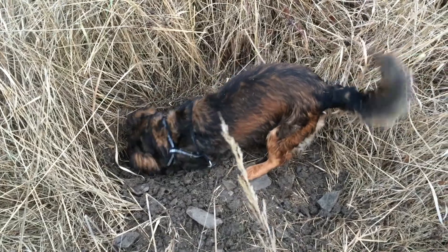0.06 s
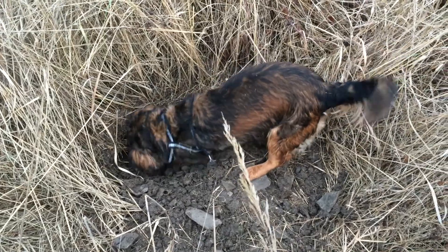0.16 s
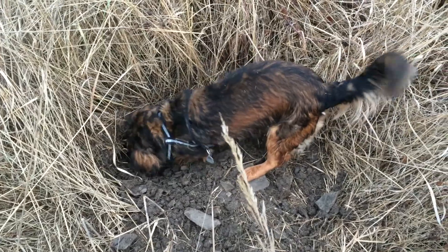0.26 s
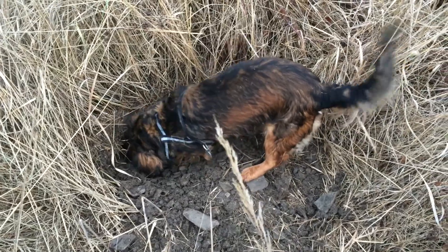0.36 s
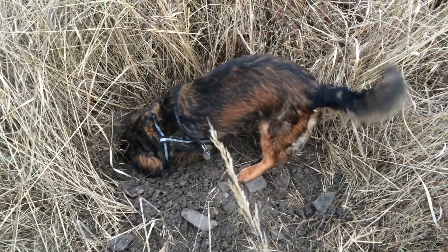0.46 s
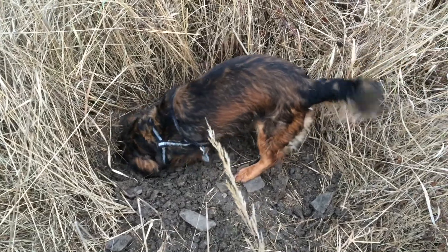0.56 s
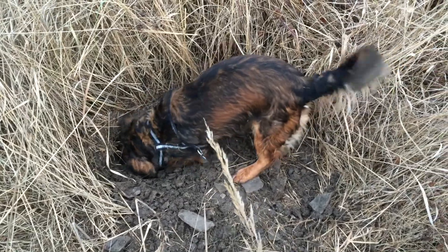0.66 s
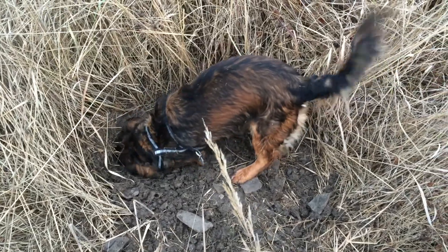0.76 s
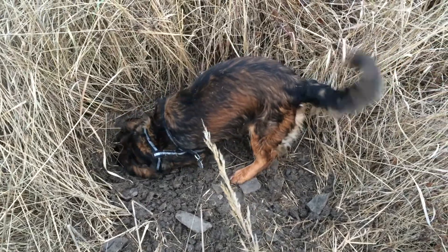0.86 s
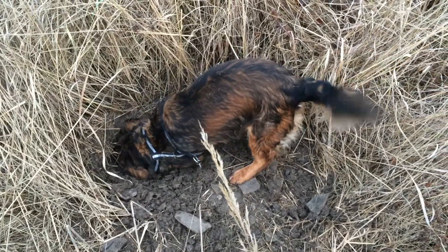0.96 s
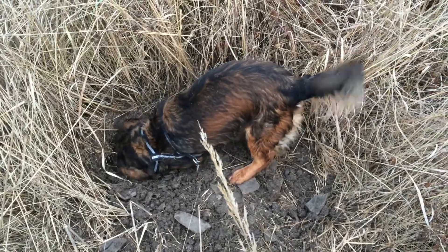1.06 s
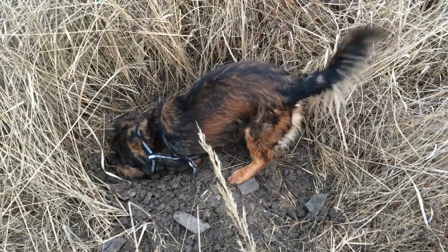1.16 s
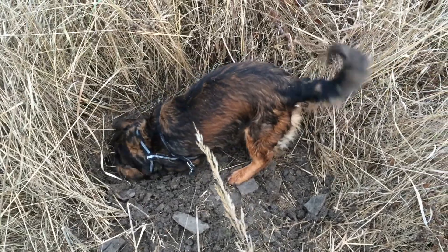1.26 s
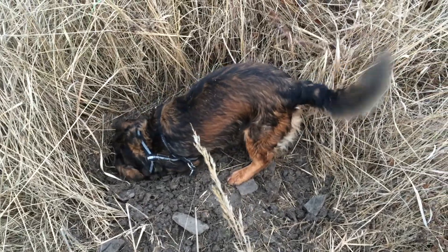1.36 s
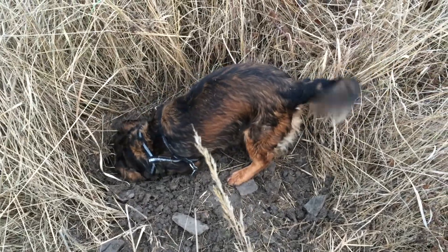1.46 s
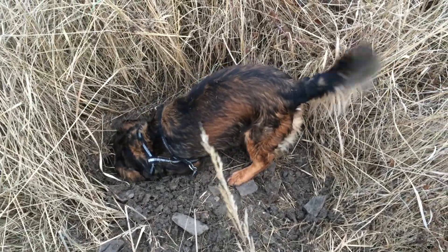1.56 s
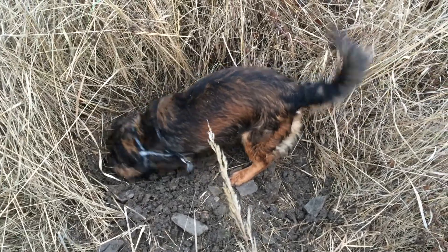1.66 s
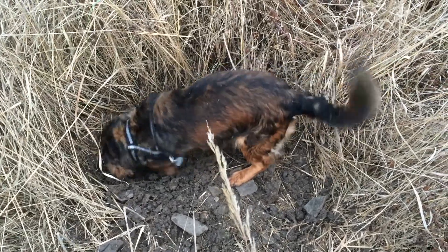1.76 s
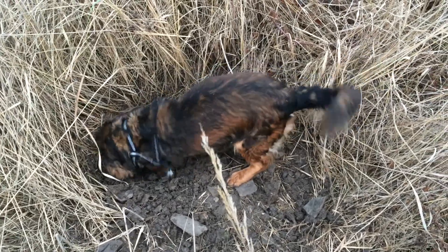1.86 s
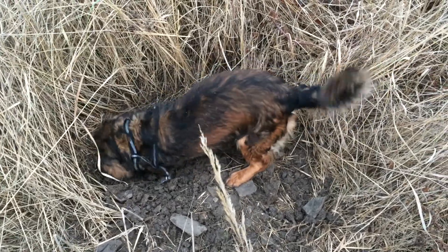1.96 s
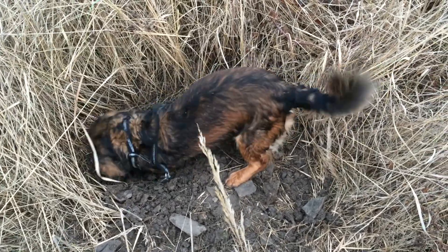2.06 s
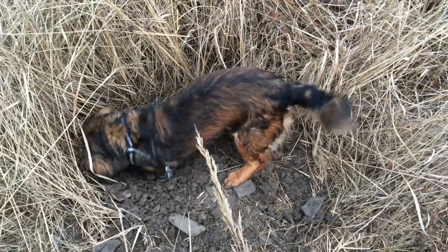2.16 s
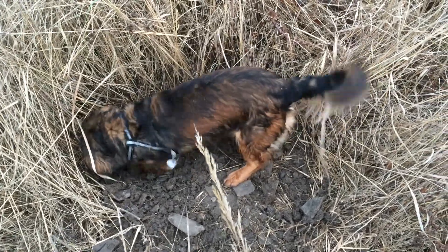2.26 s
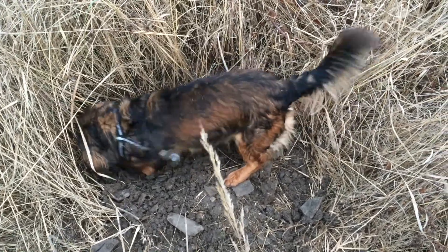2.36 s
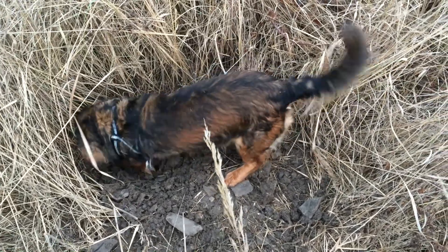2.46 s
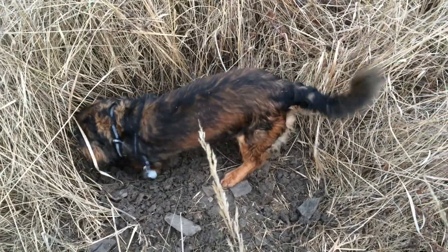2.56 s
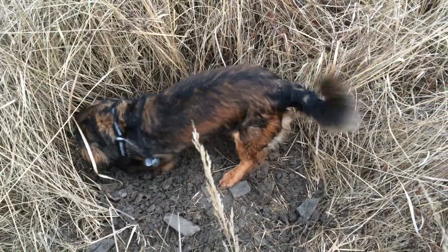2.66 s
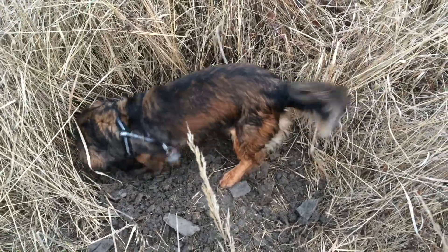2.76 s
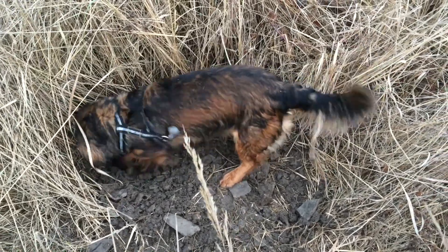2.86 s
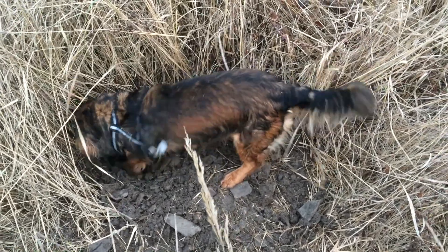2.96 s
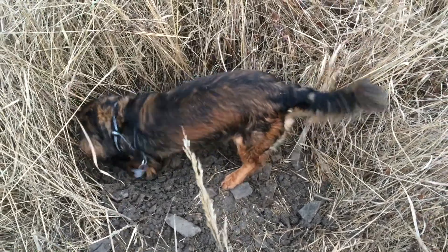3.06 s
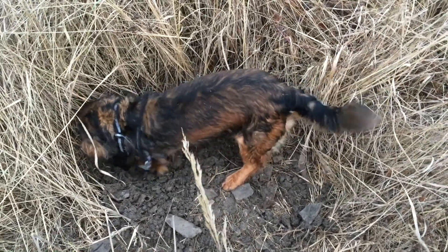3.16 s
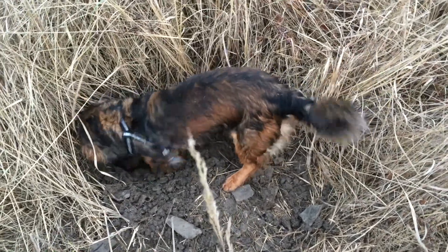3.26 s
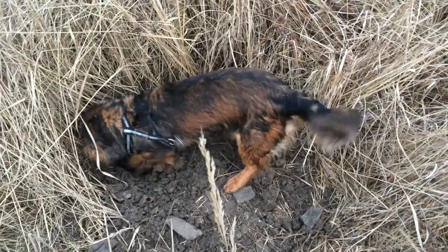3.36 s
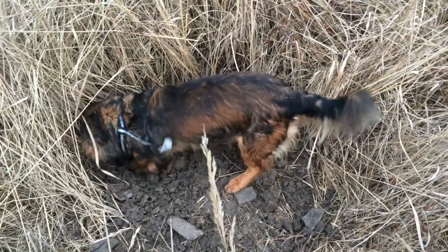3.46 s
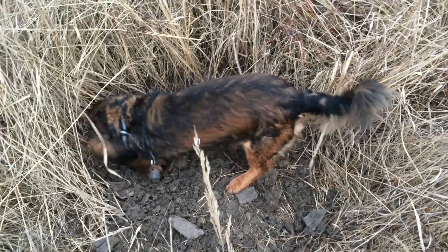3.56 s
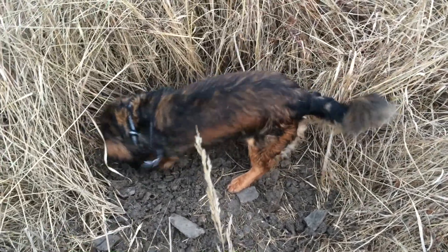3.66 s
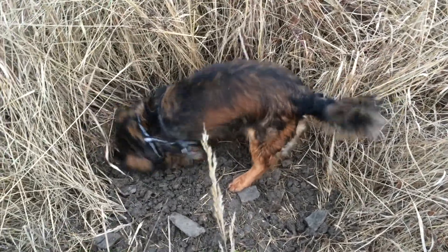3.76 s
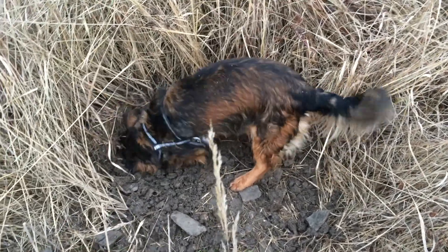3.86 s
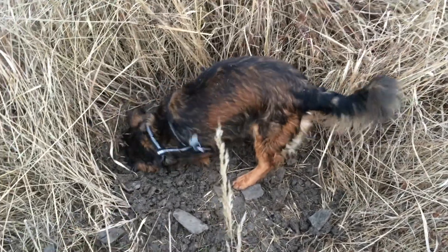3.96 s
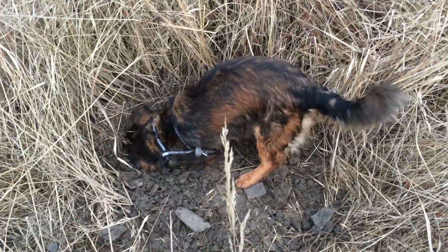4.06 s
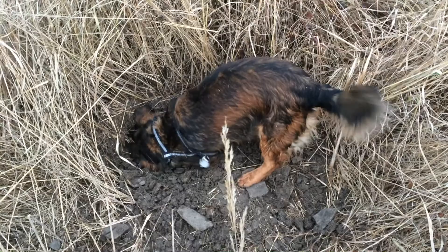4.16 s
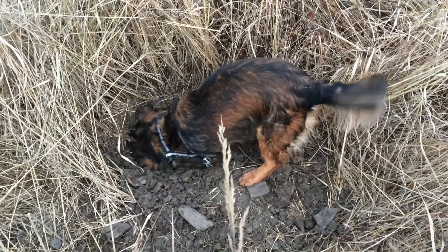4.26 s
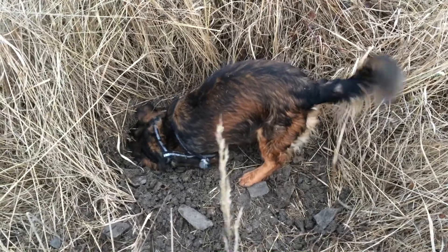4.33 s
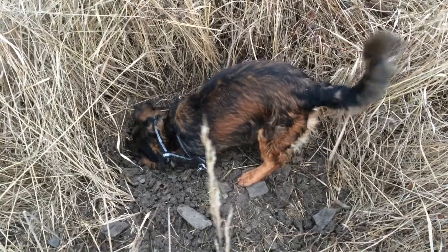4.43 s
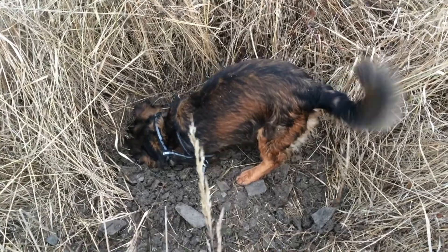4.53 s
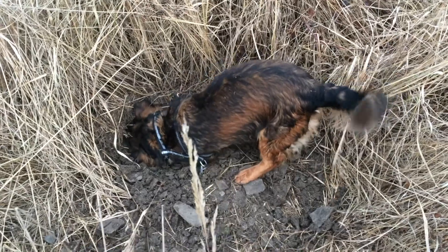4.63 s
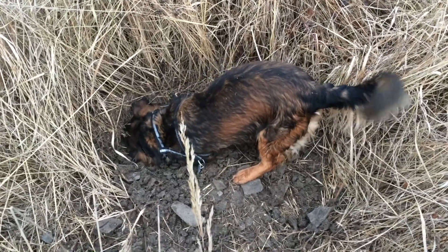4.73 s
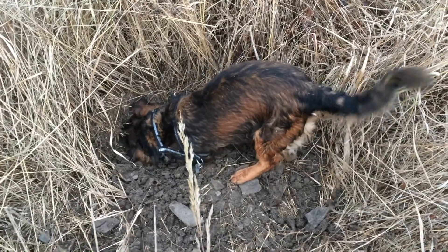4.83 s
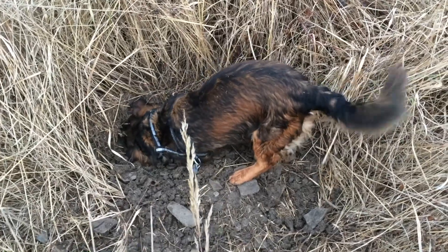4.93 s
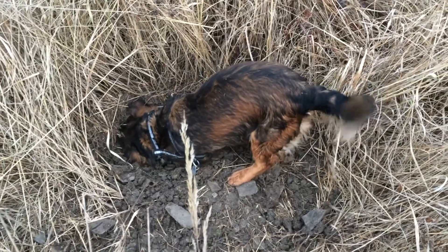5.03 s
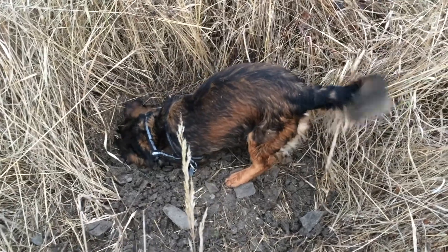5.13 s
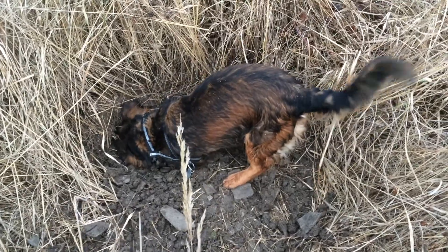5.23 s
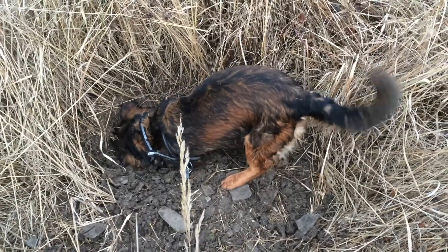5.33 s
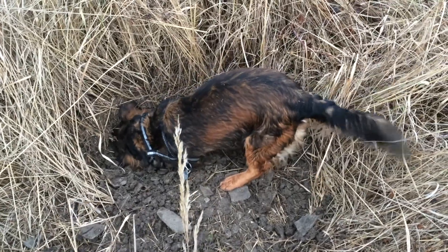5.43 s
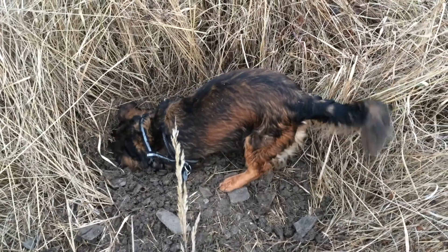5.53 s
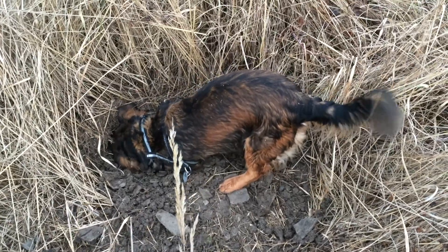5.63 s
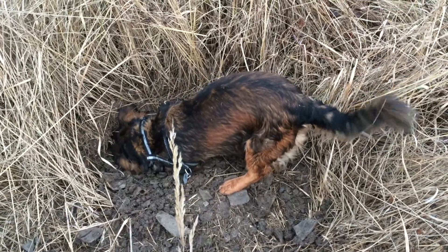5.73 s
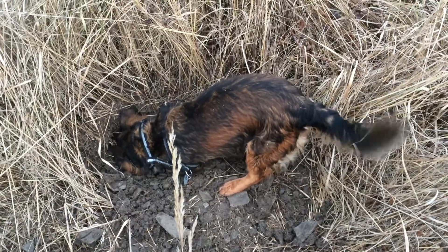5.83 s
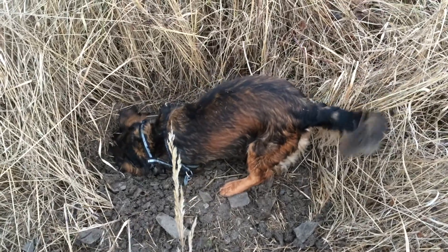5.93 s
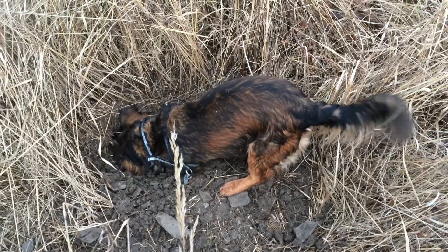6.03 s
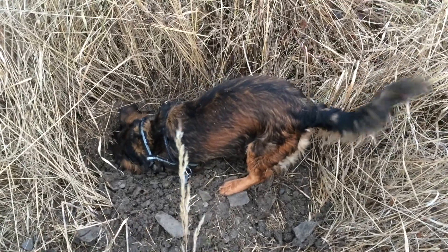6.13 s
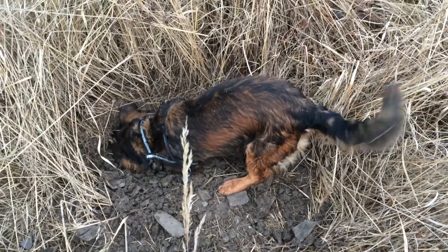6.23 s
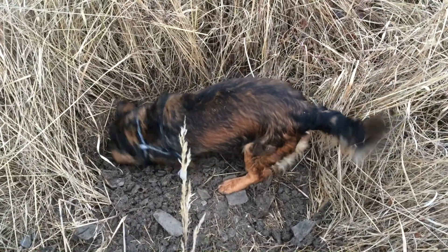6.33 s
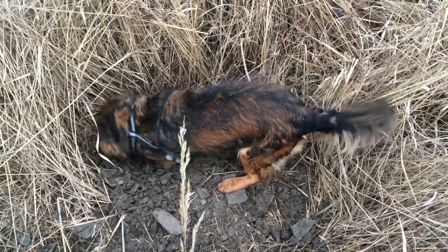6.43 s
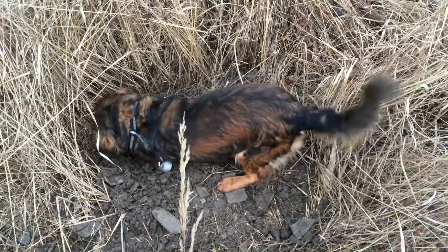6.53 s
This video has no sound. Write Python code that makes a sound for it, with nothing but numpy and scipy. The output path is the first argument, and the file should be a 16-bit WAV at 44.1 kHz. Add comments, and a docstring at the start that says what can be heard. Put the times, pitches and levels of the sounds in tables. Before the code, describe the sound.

A small dog digs in dry stony soil outdoors, a metre or two below a phone microphone, with no echo. It opens with a quick cluster of hollow paw knocks and a gritty scrape in the first 0.3 seconds, followed by faint rustling of dead grass. From about 1.8 to 4.7 seconds the dog scrabbles steadily while the metal tags on its harness clink and ring, high and irregular, brightest near 2 and 3.8 seconds. Sharp cracks of stones or stalks stand out around 2.5, 3 and 3.6 seconds. From 4.7 to 5.5 seconds the jingling stops and the dog sniffs and gives several short, rough, fluttering snorts, with a few soft paw thumps. After a lull, a last scrape, a light clink and two quick breaths come near 6.5 seconds. A distant road hums and hisses faintly throughout.

```python
"""Paws knock and scrape in dry stony soil: a small dog digs among dead grass, a metre or two below
a phone's microphone, outdoors. Grit and stalks rustle and snap under its strokes, and the metal tags
on its harness strike each other and ring. It sniffs in the hole and snorts with flapping nostrils.
A distant road hums and hisses throughout."""
import sys
import numpy as np
from scipy import signal
from scipy.fft import rfft, irfft, next_fast_len
from scipy.io import wavfile
from scipy.ndimage import uniform_filter1d

SR = 44100
rng = np.random.default_rng(int(sys.argv[2]) if len(sys.argv) > 2 else 0)


def materialize(psi):
    """Save the field psi as 16-bit PCM at rate SR to the path in sys.argv[1].

    A 1-D psi becomes a single channel; in a 2-D psi each row is a channel.
    """
    bounded = np.clip(np.atleast_2d(psi).T, -1, 1)
    quanta = np.round(bounded * 32767).astype(np.int16)
    wavfile.write(sys.argv[1], SR, quanta)


N = 290619
DIG_START_S, DIG_HOLD_S = 1.84, 2.85  # the spell of steady scrabbling


def undb(db):
    """Decibels to gain."""
    return 10 ** (np.asarray(db) / 20)


def curves(table):
    """Columns of a table joined by straight lines in time."""
    times, *columns = np.transpose(table)
    return [np.interp(np.arange(N) / SR, times, column) for column in columns]


def band(x, lo_hz, hi_hz, order=2):
    """Band-pass filter."""
    sos = signal.butter(order, [lo_hz, min(hi_hz, .45 * SR)], "band", fs=SR, output="sos")
    return signal.sosfilt(sos, x)


def resonance(hz, width_hz):
    """Noise through one broad-skirted resonance."""
    return band(rng.standard_normal(N), hz - width_hz / 2, hz + width_hz / 2, order=1)


def unit(x):
    """Scale to rms 1."""
    return x / np.sqrt(np.mean(x ** 2))


def colour(x, spectrum):
    """Shape a noise by (Hz, dB) points."""
    hz, db = np.transpose(spectrum)
    size = next_fast_len(N)
    bin_hz = np.arange(size // 2 + 1) * SR / size + 1
    gain = undb(np.interp(np.log(bin_hz), np.log(hz), db))
    return irfft(rfft(x, size) * gain, size)[:N]


def walk(per_s):
    """Random levels held 1 / per_s seconds and smoothed twice; rms 1."""
    hold = int(SR / per_s)
    steps = np.repeat(rng.standard_normal(N // hold + 1), hold)
    return unit(uniform_filter1d(uniform_filter1d(steps, hold), hold)[:N])


def grains(per_s, spread_db):
    """Random clicks of very uneven size."""
    when, size, sign = rng.random((3, N))
    return unit((when < per_s / SR) * undb(-spread_db * np.log(1 - size)) * np.sign(sign - .5))


def add(out, start_s, sound):
    """Mix a sound in at a time."""
    i = int(start_s * SR)
    out[i:i + len(sound)] += sound[:max(len(out) - i, 0)]


HIT_T = np.arange(int(.2 * SR)) / SR  # seconds since an onset


def decay(t60_s):
    """A fall of 60 dB every t60_s."""
    return undb(-60 * HIT_T / t60_s)


def ring(hz, t60_s, phase=0):
    """One decaying mode; phase in cycles."""
    return np.sin(2 * np.pi * (hz * HIT_T + phase)) * decay(t60_s)


def road(split_hz=300):
    """Far off, tyre hiss and engine rumble swell separately; narrow drones waver in the bass."""
    # traffic loudness: time_s, hiss_db, rumble_db
    levels = [(0, -54.5, -55.5), (.7, -57, -57), (2.5, -57, -56), (4.5, -58, -57.5), (5.1, -55, -52),
              (5.7, -56.5, -63.5), (6.1, -55.5, -55), (6.59, -56.5, -60)]
    # road noise at the microphone: frequency_hz, density_db
    spectrum = [(15, -65.5), (30, -39), (45, -1), (66, -17.5), (96, -6.5), (173, -3.5), (198, -8),
                (321, -18), (1050, -11.5), (1840, -20.5), (3710, -38.5), (15400, -49.5)]
    # engine drones, relative to the rumble: pitch_hz, width_hz, level_db
    engines = [(67.25, 5.2, -1.1), (176.7, 31, -6)]
    hiss_db, rumble_db = curves(levels)
    noise = colour(rng.standard_normal(N), spectrum)
    hiss = unit(band(noise, split_hz, 16000)) * undb(hiss_db + .5 * walk(5.6))
    drones = sum(undb(db) * unit(resonance(hz, width)) for hz, width, db in engines)
    rumble = unit(band(noise, 42, split_hz)) + drones
    return hiss + rumble * undb(rumble_db + 1.2 * walk(4))


def stroke(start_s, hold_s, attack_s=.029, fade_db=14, longest_fade_s=.107):
    """A sweep through grass swells, holds and dies away; short ones fade faster."""
    t = np.arange(N) / SR - start_s
    swell = np.clip(t / attack_s + .5, 0, 1)
    return swell * undb(-fade_db * np.maximum(t - hold_s, 0) / min(hold_s, longest_fade_s))


def rustle(stirring_db=-84, dig_fine_db=-72, dig_coarse_db=-69):
    """Stalks crackle finely in the treble, soil shuffles lower; a faint stirring never stops."""
    # paw, head and tail sweep grass and grit: start_s, hold_s, fine_db, coarse_db
    strokes = [(0.012, 0.15, -84, -52.5), (0.02, 0.29, -59.5, -51), (.4, 0.16, -73, -92),
               (.771, 0.032, -68.5, -73), (.85, 0.12, -69.5, -73), (1.217, 0.05, -63, -84),
               (1.35, 0.093, -68.5, -77), (1.64, 0.046, -65.5, -86), (1.72, 0.04, -70, -80),
               (2.004, 0.12, -69, -58), (2.435, 0.16, -65, -63.5), (2.66, 0.51, -68, -73),
               (3.012, 0.074, -55.5, -54), (3.5, 0.34, -68.5, -66.5), (3.876, 0.51, -70.5, -81),
               (4.7, 0.19, -68.5, -64), (6.419, 0.23, -66.5, -57.5)]
    # fine crackle of stalks: frequency_hz, density_db
    stalk_spectrum = [(1760, -47.5), (3000, -8.5), (4220, -13), (11600, -11.5), (15400, -11.5)]
    # coarse shuffle of soil: frequency_hz, density_db
    soil_spectrum = [(180, -21.5), (300, 0.5), (434, -6.5), (3100, -12), (4170, -21.5), (9000, -25.5),
                     (11700, -52.5), (19800, -120)]
    rows = np.array(strokes + [(DIG_START_S, DIG_HOLD_S, dig_fine_db, dig_coarse_db)])
    powers = np.array([stroke(start, hold) ** 2 for start, hold, _, _ in rows])
    fine_gain = np.sqrt(undb(rows[:, 2]) ** 2 @ powers + undb(stirring_db) ** 2)
    coarse_gain = np.sqrt(undb(rows[:, 3]) ** 2 @ powers)
    fine = unit(colour(rng.standard_normal(N) + 1.2 * grains(1000, spread_db=2.2), stalk_spectrum))
    coarse = unit(colour(rng.standard_normal(N) + .8 * grains(700, spread_db=1.6), soil_spectrum))
    return fine * fine_gain * undb(2 * walk(50)) + coarse * coarse_gain * undb(1.6 * walk(40))


def sniffs():
    """Air hisses through the resonances of the nose."""
    # strength of the sniffing: time_s, level_db
    levels = [(4.69, -70), (4.75, -59.5), (4.9, -61), (4.95, -70.5), (5.05, -68), (5.12, -62.5),
              (5.2, -68.5), (5.35, -76)]
    # nose resonances: centre_hz, width_hz, gain_db
    nose = [(3430, 570, 0.5), (5480, 1200, 0), (7100, 1250, -6.5)]
    t = np.arange(N) / SR
    (level_db,) = curves(levels)
    sniffing = (t > levels[0][0]) & (t < levels[-1][0])
    air = sum(undb(db) * resonance(hz, width) for hz, width, db in nose)
    return sniffing * unit(air) * undb(level_db + 1.7 * walk(51))


def whiffs(relative_width=.35):
    """Short breaths whistle through one nose resonance."""
    # breaths: start_s, end_s, centre_hz, level_db
    breaths = [(2.089, 2.226, 1750, -53.5), (4.736, 4.778, 4030, -56), (6.441, 6.53, 2370, -55.5),
               (6.549, 6.598, 2420, -50)]
    out = np.zeros(N)
    for start, end, hz, db in breaths:
        noise = rng.standard_normal(int((end - start) * SR))
        air = unit(band(noise, hz * (1 - relative_width / 2), hz * (1 + relative_width / 2)))
        add(out, start, undb(db) * air * np.hanning(len(air)))
    return out


def snorts(jitter_s=.0008, spread_db=3):
    """Nostrils flap unevenly: rough dull pulses, each with a puff of air."""
    # bursts of flapping: start_s, end_s, drive_db, flap_rate_hz
    bursts = [(4.877, 4.926, -47.5, 240), (4.933, 4.967, -43.5, 300), (5.063, 5.15, -51.5, 250),
              (5.464, 5.506, -55, 190)]
    flaps = np.zeros(N)
    for start, end, db, rate in bursts:
        times = np.arange(start, end, 1 / rate)
        slip, force = rng.standard_normal((60, 2))[:len(times)].T
        flaps[((times + jitter_s * slip) * SR).astype(int)] = undb(db + spread_db * force)
    puffs = signal.lfilter([1], [1, -.993], flaps) * rng.standard_normal(N)
    return 18 * band(flaps + .12 * puffs, 435, 2200, order=5) + 60 * band(flaps, 143, 327)


def blunt_clicks(t60_s=.0072):
    """Short clicks without ringing: three bright cracks, then three dull pops within the snorts."""
    # cracks and pops: start_s, level_db, top_hz
    clicks = [(2.5407, -26, 8900), (2.543, -24.5, 9100), (2.5474, -31, 5860), (4.9354, -39, 2480),
              (4.95, -38, 2250), (5.0675, -30, 2470)]
    out = np.zeros(N)
    for start, db, top_hz in clicks:
        burst = rng.standard_normal(len(HIT_T)) * decay(t60_s)
        add(out, start, undb(db) * band(burst, 240, top_hz, order=3))
    return out


def snaps(free_s=.0059, attack_s=.00046):
    """A stone or dry stalk snaps and rings short and bright, until the piece lands; at 2.481, 3.68, 3.899 and
    4.083 s the tags instead meet with a bare tick and hardly ring."""
    # breaks, and tag ticks at 2.481, 3.68, 3.899 and 4.083 s: start_s, body_db, pitch_hz, treble_db
    breaks = [(1.5227, -61, 2100, -40.5), (2.378, -59, 2100, -44.5), (2.481, -51, 2000, -44),
              (3.609, -51, 3300, -48), (2.562, -48.5, 3200, -58), (2.705, -48.5, 3200, -50),
              (3.013, -49, 2070, -18.5), (3.221, -51.5, 3450, -44), (3.337, -47.5, 2630, -53),
              (3.645, -21.5, 2380, -24.5), (3.68, -71, 2140, -40), (3.899, -67, 2940, -36),
              (4.083, -61, 3000, -38)]
    # modes of the broken piece: pitch_ratio, level_db, t60_s
    modes = [(.38, -24, .012), (1, 0, .022), (1.15, -2, .026), (1.82, -6, .014), (3.4, -5, .01)]
    out = np.zeros(N)
    landing = undb(-6000 * np.maximum(HIT_T - free_s, 0))
    attack = np.minimum(HIT_T / attack_s, 1)
    for start, body_db, hz, treble_db in breaks:
        burst = rng.standard_normal(len(HIT_T)) * decay(.016)
        ringing = sum(undb(db) * ring(ratio * hz, t60) for ratio, db, t60 in modes)
        body = (ringing * landing + band(burst, 2900, 6200, order=3)) * attack
        add(out, start, undb(body_db) * body + undb(treble_db) * band(burst, 6560, 12600, order=3))
    return out


def knocks(knock_t60_s=.023, thump_hz=165, thump_t60_s=.027, attack_s=.0021):
    """Hollow knocks over low thumps: paws on soil, and two low pulses of the snorts."""
    # paw blows, and snort pulses at 4.906 and 4.949 s: start_s, knock_db, pitch_hz, thump_db
    pulses = [(0.012, -35, 330, -35), (0.018, -28.5, 560, -27.5), (0.043, -23, 855, -34),
              (0.054, -19, 810, -22.5), (0.088, -18.5, 763, -45), (0.173, -23.5, 684, -56),
              (0.188, -25.5, 840, -39), (0.227, -20, 864, -55), (1.851, -46, 480, -36),
              (2.541, -38, 447, -39), (4.403, -44.5, 467, -37.5), (4.906, -32.5, 296, -61),
              (4.949, -40, 330, -31), (5.083, -36.5, 483, -26.5), (5.136, -35, 530, -28),
              (5.462, -35, 603, -47), (5.481, -40, 557, -36.5), (5.607, -37.5, 820, -43),
              (6.522, -33, 600, -54)]
    out = np.zeros(N)
    attack = np.minimum(HIT_T / attack_s, 1)
    for start, knock_db, hz, thump_db in pulses:
        knock = ring(hz, knock_t60_s) + .51 * ring(.38 * hz, knock_t60_s)
        rough_tail = .63 * band(rng.standard_normal(len(HIT_T)), 144, 1010) * decay(.062)
        thump = undb(thump_db) * ring(thump_hz, thump_t60_s)
        add(out, start, (undb(knock_db) * (knock + rough_tail) + thump) * attack)
    return out


def tag_brushes(count=200, per_s=18, loudest_db=-58, spread_db=20, ring_time_factor=.2):
    """Light chance contacts of the tags while the dog digs, as rows like the clinks."""
    chance = rng.random((count, 4))
    times = DIG_START_S + np.cumsum(-np.log(1 - chance[:, 0])) / per_s
    return [(start, *(loudest_db - spread_db * softness), ring_time_factor)
            for start, softness in zip(times, chance[:, 1:]) if start < DIG_START_S + DIG_HOLD_S]


def tag_ring(modes, blows_db, chance, spot_db=3.5, detune=.0012, twin_hz=60):
    """Struck metal rings: the spot hit favours some modes, and a close twin makes each one beat."""
    out = np.zeros(len(HIT_T))
    for (piece, hz, db, t60), (spot, slip, beat) in zip(modes, np.reshape(chance, (-1, 3))):
        mode = ring(hz * (1 + detune * slip), t60)
        twin = .38 * ring(hz + twin_hz * beat, t60, phase=slip)
        out += undb(blows_db[piece] + db + spot_db * spot) * (mode + twin)
    return out * np.minimum(HIT_T / .00016, 1)


def tag_tick(clash):
    """Metal edges meet: a bright click and a brief ping, its pitch shifted by clash."""
    click = band(rng.standard_normal(len(HIT_T)), 4500, 14000) * decay(.011)
    ping_hz = np.clip(9000 * 1.1 ** clash, 6000, 15000)
    return click + .7 * ring(ping_hz, t60_s=.012)


def tags(mute_db=-16, free_s=.036, fur_db_per_s=-1500, linger_db=-18, tick_db=-1, bounce_db=-14):
    """Two tags and a harness ring tick, bounce and ring until the next clink or the fur damps them."""
    # metal strikes metal: start_s, first_tag_db, second_tag_db, harness_ring_db, ring_time_factor
    clinks = [(.495, -63, -71, -67, 0.22), (1.526, -57, -77, -71, 0.53), (1.921, -58.5, -63, -63, 0.86),
              (2.0188, -37.5, -45, -52, .3), (2.024, -35.5, -49.5, -47, 0.11),
              (2.0334, -19.5, -45, -55, .45), (2.0642, -35, -45.5, -52, 0.46), (2.188, -53, -47, -47, 0.19),
              (2.244, -61, -57, -63, 0.11), (2.305, -58, -66, -58, 0.13), (2.5714, -48, -41, -48, 0.099),
              (2.582, -45, -55, -63, 0.12), (2.668, -68, -49, -50.5, 0.58), (2.687, -40, -41, -37, 0.38),
              (2.8126, -44, -33.5, -45, 0.26), (2.8733, -40.5, -38, -46, 0.32),
              (2.901, -47, -49, -45, 0.21), (2.938, -46, -42, -60, 0.09), (2.9836, -41, -49, -60, 0.78),
              (3.217, -68, -48.5, -75, 0.19), (3.2997, -42.5, -47.5, -46, 0.37),
              (3.474, -39, -62, -46, 0.24), (3.549, -53, -57, -39, 0.063), (3.578, -49, -52, -63, .76),
              (3.662, -45, -52, -65, 0.091), (3.68, -38, -48, -54, 0.046), (3.719, -66, -48, -58, 0.17),
              (3.805, -50, -32.5, -46, 0.22), (3.8134, -26.5, -30.5, -63, 2.2),
              (3.901, -48, -47, -46, 0.18), (3.915, -47, -55, -63, 0.053), (4.047, -52, -62, -49, 0.12),
              (4.098, -52, -52, -44, 0.41), (4.102, -33, -31, -36, 0.29), (4.187, -75, -48, -55, 0.36),
              (4.245, -65.5, -43, -72, 0.58), (4.261, -52, -33.5, -41, 0.24), (4.309, -45, -64, -66, 0.3),
              (4.325, -42, -51, -64, 0.14), (4.352, -54, -57, -66, 0.084), (4.366, -34.5, -71, -76, 1.26),
              (4.483, -62, -46, -75, 0.49), (4.592, -41.5, -39, -74, 1.3), (4.675, -58, -64, -51, 0.64),
              (6.504, -49.5, -71, -59, 2.1)]
    # modes, one row a piece: pitch_hz of each
    pitches = [
        [8730, 11620, 10250],
        [11880, 14583, 5873],
        [6360, 13850],
    ]
    # free ring of the same modes: level_db, t60_s
    decays = [
        [(-4, .2), (-3, .09), (-20, .03)],
        [(-2, .09), (-5, .1), (-19, .45)],
        [(-1, .04), (0, .05)],
    ]
    modes = [(piece, hz, db, t60) for piece in range(len(pitches))
             for hz, (db, t60) in zip(pitches[piece], decays[piece])]
    most_brushes = 200
    brushes = tag_brushes(most_brushes)
    chance = rng.standard_normal((len(clinks) + most_brushes, 3 + 3 * len(modes)))
    mute_times = [row[0] for row in clinks[1:]] + [N / SR] * (1 + len(brushes))
    out = np.zeros(N)
    for (start, *blows_db, factor), mute_s, luck in zip(clinks + brushes, mute_times, chance):
        bounces, clash, mode_luck = luck[:2], luck[2], luck[3:]
        muting = undb(mute_db * np.clip((HIT_T - (mute_s - start)) / .0027, 0, 1))
        fur = undb(np.maximum(fur_db_per_s * np.maximum(HIT_T - free_s * factor, 0), linger_db))
        ringing = tag_ring(modes, blows_db, mode_luck) * muting * fur
        clink = ringing + undb(max(blows_db) + tick_db) * tag_tick(clash)
        add(out, start, clink)
        for late in bounces:
            add(out, start + .0054 + .0065 * abs(late), undb(bounce_db) * clink)
    return out


def scene():
    """The dog close by and the road far off, in open air without echo; mono."""
    dog = tags() + knocks() + blunt_clicks() + snaps() + snorts() + rustle() + sniffs() + whiffs()
    return (dog + road())[None]


def record(dry, top_hz=16392):
    """The phone rolls off steeply at the top."""
    return signal.sosfilt(signal.cheby2(12, 60, top_hz, fs=SR, output="sos"), dry)


dry = scene()
out = record(dry)
materialize(out)
```